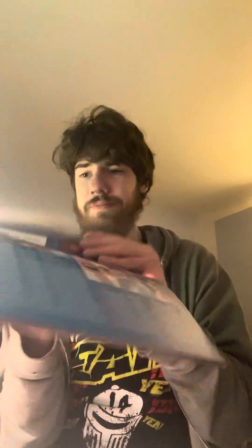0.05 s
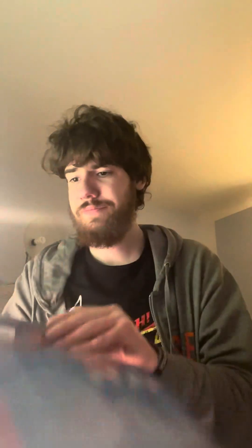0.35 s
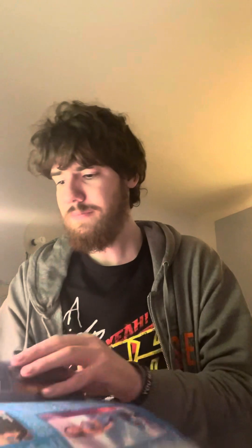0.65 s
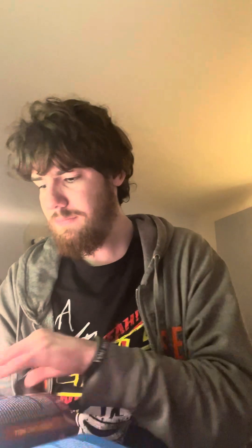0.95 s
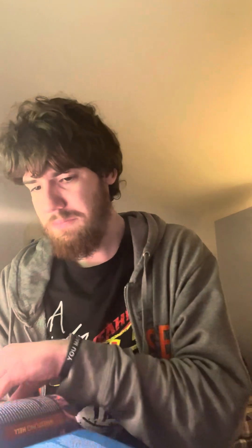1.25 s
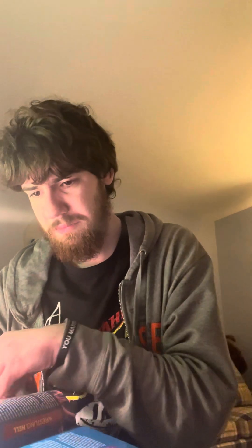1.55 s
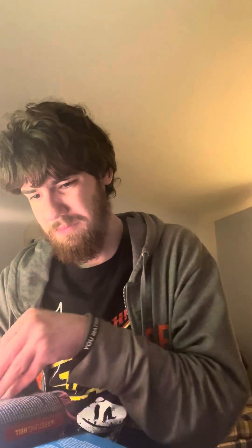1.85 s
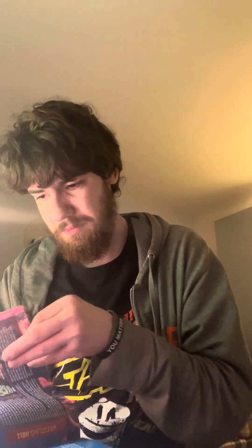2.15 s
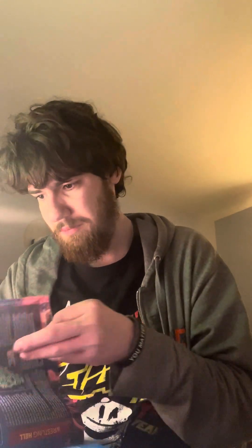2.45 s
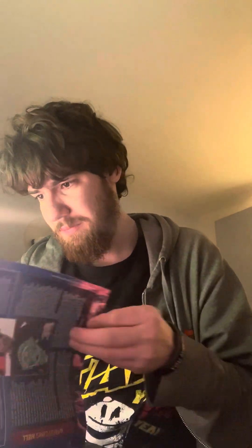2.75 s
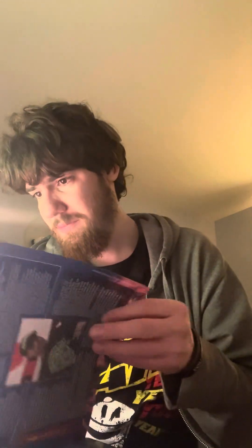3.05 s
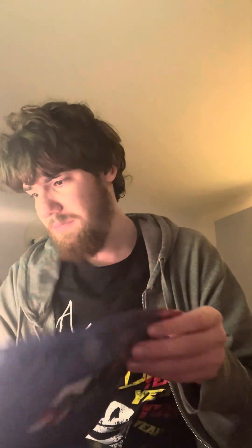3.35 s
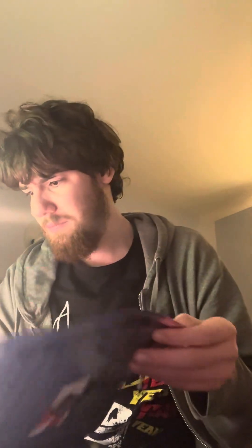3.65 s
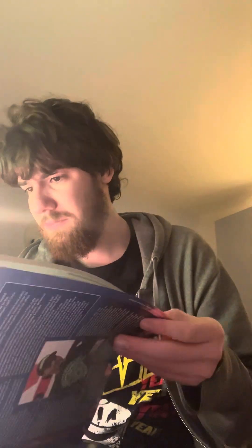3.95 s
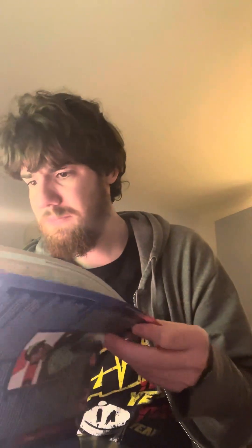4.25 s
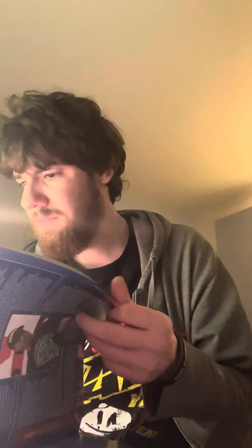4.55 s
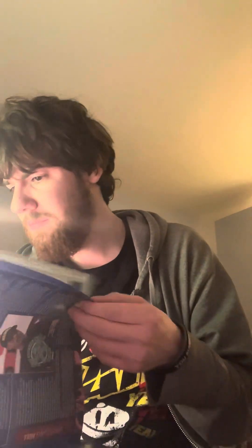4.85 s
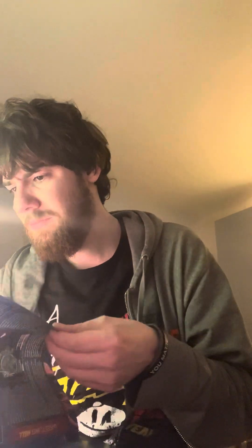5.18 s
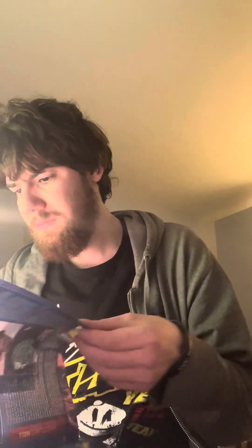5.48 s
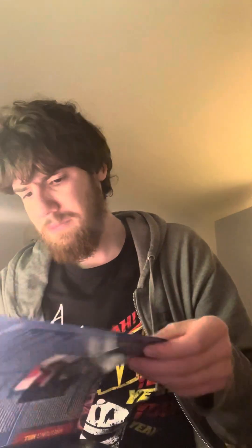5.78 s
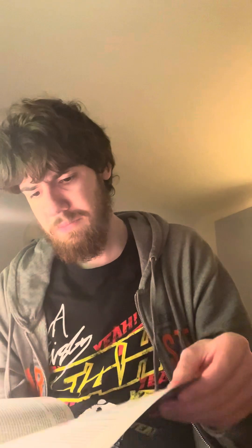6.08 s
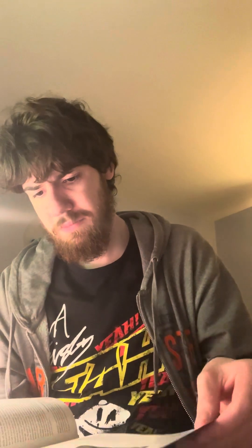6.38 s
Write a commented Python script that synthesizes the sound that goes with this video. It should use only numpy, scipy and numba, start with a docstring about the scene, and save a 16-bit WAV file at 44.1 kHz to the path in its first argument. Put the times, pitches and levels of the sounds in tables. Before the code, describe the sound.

A magazine cover slaps down, then someone leafs through the pages, making papery snaps, a grainy hiss and soft flaps.

```python
"""A glossy magazine is handled close to a phone in a small quiet room, over mains hum and low rumble.
First it slides off to one side and its cover slaps down. Then it is held in front and leafed through:
stick-slip friction makes a grainy hiss, buckling sheets send out snaps that dispersion draws into
falling chirps, and limp sheets flop over with dull flaps. Near 4 s one page is drawn slowly across the
stack; a flurry of snaps follows, and a faint drone joins near the end."""
import sys
import numpy as np
from scipy import signal
from scipy.fft import rfft, irfft, next_fast_len
from scipy.io import wavfile
from scipy.ndimage import uniform_filter1d
from numba import njit

SR = 44100
rng = np.random.default_rng(int(sys.argv[2]) if len(sys.argv) > 2 else 0)


def pcm_store(signal):
    """Save signal as 16-bit PCM."""
    levels = np.round(np.clip(np.atleast_2d(signal), -1, 1) * 32767)
    wavfile.write(sys.argv[1], SR, levels.astype(np.int16).T)


N = 283122
TIME = np.arange(N) / SR
SIZE = 8192  # samples in one short event
MS = (np.arange(SIZE) - SIZE // 2) * 1000 / SR  # time from the middle of that event [ms]


def undb(db):
    """Amplitude ratio of a level in decibels."""
    return 10 ** (np.asarray(db) / 20)


def unit(x):
    """Normalisation to unit rms."""
    return x / np.sqrt(np.mean(x ** 2))


def curve(rows):
    """Linear interpolation of a table's columns over time."""
    times, *columns = np.transpose(rows)
    return [np.interp(TIME, times, column) for column in columns]


def gains(points, hz):
    """Interpolation of a spectrum (frequency [Hz], level [dB]) on a logarithmic frequency axis."""
    corners, db = np.transpose(points)
    return undb(np.interp(np.log(hz + 1), np.log(corners), db))


def colour(x, points):
    """Linear filtering by a spectrum (frequency [Hz], level [dB])."""
    size = next_fast_len(len(x))
    return irfft(rfft(x, size) * gains(points, np.fft.rfftfreq(size, 1 / SR)), size)[:len(x)]


def add(track, s, x):
    """Superposition of a sound whose middle falls at time s."""
    start = int(s * SR) - len(x) // 2
    lo, hi = max(start, 0), min(start + len(x), N)
    track[lo:hi] += x[lo - start:hi - start]


def wander(rate):
    """Random modulation: straight lines between Gaussian values, rate of them a second."""
    steps = rng.standard_normal(4096)
    return 0.57 * np.interp(TIME * rate, np.arange(len(steps)), steps)


@njit
def resonate(x, hz, width):
    """Second-order resonance with a moving centre; width is bandwidth over centre frequency."""
    y, band, low = np.empty(len(x)), 0., 0.
    for i in range(len(x)):
        g = np.tan(np.pi * hz[i] / SR)
        v = (band + g * (x[i] - low)) / (1 + g * (g + width))
        band, low, y[i] = 2 * v - band, low + 2 * g * v, width * v
    return y


def mode(x, hz, width):
    """Resonance at a constant frequency."""
    return resonate(x, np.full(len(x), float(hz)), width)


def slips(size, spread_db):
    """Stick-slip noise: dense tiny slips of log-normal strength."""
    return unit(rng.standard_normal(size) * undb(spread_db * np.clip(rng.standard_normal(size), -3, 3)))


def disperse(x, travel_ms):
    """Dispersion of bending waves: travel time, given at 1 kHz, goes as 1 / sqrt(frequency)."""
    khz = np.fft.rfftfreq(len(x), 1 / SR) / 1000
    cycles = travel_ms * (2 * np.sqrt(khz) - khz / np.sqrt(2))  # 2 kHz stays in place
    return irfft(rfft(x) * np.exp(-2j * np.pi * cycles), len(x))


def impulse(scatter, rise_ms, decay_ms):
    """Impulsive excitation: slips build up to a sudden release and die away after it."""
    around = slips(SIZE, spread_db=3.5) * np.exp(-np.abs(MS / np.where(MS < 0, rise_ms, decay_ms)))
    return (MS == 0) + scatter * around / np.linalg.norm(around)


def radiate(x, points, db):
    """Radiation of a transient with a given spectrum and the energy of 10 ms at level db."""
    y = colour(x, points)
    return y * undb(db) * np.sqrt(SR / 100) / np.linalg.norm(y)


# harmonics of the mains: (frequency [Hz], level [dB])
MAINS_HUM = [(59.6, -60.5), (120, -65.5)]
# spectrum of the house's rumble: (frequency [Hz], level [dB])
HOUSE_RUMBLE = [(24, -25.5), (40, -14.5), (55, 4), (80, -3.5), (120, -6), (180, -16), (1000, -31),
                (3000, -40), (16000, -61.5)]
def background(rumble_db, apart_db):
    """Tones in noise: mains hum over a rumble that is partly coherent between the microphone ports."""
    hum = sum(np.sqrt(2) * undb(db) * np.sin(2 * np.pi * (hz * TIME + rng.random()))
              for hz, db in MAINS_HUM)
    shared, left, right = (unit(colour(rng.standard_normal(N), HOUSE_RUMBLE)) for _ in range(3))
    rumble = shared + undb(apart_db) * np.array([left, right])
    rumble *= undb(rumble_db + 0.38 * wander(rate=12))
    return (hum + rumble) * undb([[.9], [-.9]])


def drone(start_s, hz, db, width):
    """Narrow-band noise: a faint, wavering low note from elsewhere in the house."""
    note = unit(mode(mode(rng.standard_normal(N), hz, width), hz, width))
    return note * undb(db - ATTACK_DB_PER_S * np.maximum(start_s - TIME, 0))


def room(x, bass_t60_s, broad_t60_s):
    """Reverberation: exponentially decaying diffuse echoes, alike at both ports in the bass."""
    t = TIME[:SR // 2]
    bass_spectrum = [(110, 13.5), (180, 8), (380, 5), (550, -0.5), (1200, -30), (3000, -40)]
    broad_spectrum = [(100, 7.5), (600, 5.5), (5000, 2), (8000, -9.5), (15000, -28)]
    bass = colour(rng.standard_normal(len(t)), bass_spectrum)
    onset = np.clip((t - .003) / 0.0033, 0, 1)
    out = []
    for _ in range(2):
        broad = colour(rng.standard_normal(len(t)), broad_spectrum)
        tail = bass * undb(-60 * t / bass_t60_s) + broad * undb(-60 * t / broad_t60_s)
        out.append(signal.fftconvolve(x, tail * onset / np.sqrt(SR / 50))[:N])
    return np.array(out) * undb([[1.5], [-1.5]])


# reflection off the reader's chest: (left delay [ms], right delay [ms], gain [dB])
CHEST_ECHO = [(3.397, 3.695, -13)]
def chest_reflection(x):
    """Comb filtering: an early reflection interferes with the direct sound differently at each port."""
    reflected = colour(x, [(300, -44.5), (1500, 4), (5000, 7), (12000, -4.5)])
    return sum(undb(db) * np.array([np.interp(TIME - ms / 1000, TIME, reflected) for ms in delays])
               for *delays, db in CHEST_ECHO)


# excess of the left port over the right at full shade: (frequency [Hz], level [dB])
LEFT_EXCESS = [(200, 4.5), (700, 9), (1300, 5.5), (2100, 1.5), (2800, 13), (3600, 6.5), (4600, 2),
               (5800, 4.5), (8500, 0), (15000, 0)]
# lead of the left port for paper in front, to one side and below: (frequency [Hz], phase [rad])
LEAD_AHEAD = [(0, 0), (1500, 1.1), (2800, -.3), (4500, .1), (5500, .6), (8300, 3.1), (11000, 6.3),
              (16500, 12.6)]
LEAD_ASIDE = [(0, 0), (16500, 18.8)]
LEAD_BELOW = [(0, 0), (2500, 1.5), (7000, 2.5), (11000, 6.3), (16500, 12.6)]
def ports(x, lead, shade):
    """Path difference and shadowing: two ports differ in phase, and in level as scaled by shade."""
    size = next_fast_len(N + SIZE)
    hz = np.fft.rfftfreq(size, 1 / SR)
    left = gains(LEFT_EXCESS, hz) ** shade
    right = np.exp(-1j * np.interp(hz, *np.transpose(lead)))
    equal_power = np.sqrt(2 / (1 + left ** 2))
    return irfft(rfft(x, size) * np.array([left, right]) * equal_power, size)[:, :N]


# modes of the air under the arched pages: (frequency [Hz], bandwidth [Hz], gain [dB])
CAVITY_MODES = [(336, 40, -4.5), (1120, 290, -14)]
def cavity(x, coupling):
    """Cavity resonance: the air under the pages adds a hollow note to the sound that drives it."""
    return x + coupling * sum(undb(db) * mode(x, hz, width / hz) for hz, width, db in CAVITY_MODES)


# a page edge flicks past its neighbour: (time [s], level [dB], resonance [Hz])
EDGE_TICKS = [(.056, -58.5, 3700), (.183, -63, 4150), (.215, -62, 3300), (1.213, -57, 1770),
              (3.458, -62.5, 1020), (3.495, -58, 1020), (3.579, -56, 960), (4.216, -48, 3000),
              (5.18, -55, 4000), (5.269, -53, 3650), (5.348, -64, 5450), (6.083, -60.5, 4800)]
def ticks(width):
    """Impulse response of a heavily damped page edge: a dry click with a short ring."""
    out = np.zeros(N)
    for s, db, hz in EDGE_TICKS:
        click = impulse(scatter=1, rise_ms=0.5, decay_ms=2)
        add(out, s, radiate(mode(click, hz, width), [(300, -17), (700, -2)], db))
    return out


# brushes of a fingertip or page edge, and one very short bright burst that sharpens the crack of the loud snap
# at 5.43 s: (time [s], level [dB], half length [ms], resonance [Hz])
EDGE_SWISHES = [(.484, -46.5, 28, 4600), (.552, -47.5, 4.2, 4600), (0.802, -53, 7.8, 1920),
                (1.987, -38.5, 8.2, 2340), (2.037, -34.5, 5.3, 2320), (2.126, -42.5, 13, 1550),
                (2.314, -40.5, 3.3, 2220), (4.14, -40.5, 2.6, 3860), (4.199, -39.5, 3.7, 4250),
                (4.829, -30, 4.3, 2210), (5.006, -37.5, 5.5, 2230), (5.369, -46.5, 7.2, 3220),
                (5.403, -47.5, 8, 3230), (5.4293, -26, 0.49, 3270), (5.515, -38, 5, 3600)]
def swishes(width, gain_db):
    """Forced vibration: a burst of friction swells and dies in two resonances of the page edge."""
    out = np.zeros(N)
    for s, db, half_ms, hz in EDGE_SWISHES:
        rub = sum(mode(slips(SIZE, spread_db=1), hz * ratio, width) for ratio in (.9, 1.4))
        rub = unit(colour(rub, [(700, 9), (1900, 9), (6000, -1), (9000, 8.5), (16000, -10.5)]))
        add(out, s, rub * undb(db + gain_db) * np.exp(-.5 * (MS / half_ms) ** 2))
    return out


ATTACK_DB_PER_S, RELEASE_DB_PER_S = 752.5, 348
def gesture(start, length, arch_db):
    """Envelope of a stroke [dB]: it sets in, arches with the speed of the hand and dies away."""
    early, late = np.maximum(start - TIME, 0), np.maximum(TIME - start - length, 0)
    along = np.clip(2 * (TIME - start) / length - 1, -1, 1)
    return -ATTACK_DB_PER_S * early - arch_db * along ** 2 - RELEASE_DB_PER_S * late


# one page is drawn across the stack: (time [s], hiss [dB], drumming [dB], sheen [dB])
PAGE_PULL = [(3.74, -50.5, -64, -58.5), (3.84, -49, -52, -69.5), (3.94, -48.5, -51.5, -69.5),
             (3.99, -42, -42.5, -61), (4.05, -47, -49, -65), (4.25, -50, -52.5, -66.5),
             (4.32, -48.5, -64, -65), (4.41, -44, -51.5, -58), (4.55, -46, -56, -62.5),
             (4.635, -41.5, -56, -56.5), (4.70, -44.5, -54.5, -53.5), (4.76, -45.5, -49.5, -62.5),
             (4.83, -36, -54.5, -52), (4.89, -50.5, -48.5, -67)]
def page_pull():
    """Sustained friction: amplitude envelopes of hiss, drumming and sheen during the slow pull."""
    start, end = PAGE_PULL[0][0], PAGE_PULL[-1][0]
    return undb(np.array(curve(PAGE_PULL)) + gesture(start, end - start, arch_db=0))


# a hand or sheet slides over the paper:
# (start [s], length [s], hiss [dB], drumming [dB re hiss], sheen [dB re hiss])
HAND_STROKES = [(0.0, 0.2, -58.5, -3.5, -16), (0.277, 0.084, -60, -3.5, -11), (0.43, 0.054, -42, -4.5, -14),
                (0.469, 0.022, -37, -6, -8.5), (0.503, 0.15, -59.5, -6, -10.5),
                (0.704, 0.13, -58, -0.5, -11), (0.85, 0.16, -63, 1.5, -7), (1.142, 0.15, -66.5, 1.5, -5.5),
                (1.316, 0.084, -66, -1.5, -13), (1.436, 0.14, -69, -4, -14), (1.592, 0.25, -65, -4, -8.5),
                (1.89, 0.046, -60.5, 5, -9.5), (1.964, 0.18, -51, -4.5, -14), (2.237, 0.098, -51, 0, -21),
                (2.37, 0.037, -60.5, 3, -3.5), (2.452, 0.087, -70.5, 15, -8),
                (2.801, 0.023, -48.5, 2.5, -19), (2.883, 0.039, -49.5, -3.5, -22),
                (2.936, 0.18, -46, -4.5, -16.5), (3.118, 0.15, -62.5, -4, -8),
                (3.316, 0.049, -71, 2.5, -6.5), (3.499, 0.16, -68.5, 5, -9.5), (4.933, 0.03, -55, 9, -31),
                (4.98, 0.018, -44, 8, -16), (5.544, 0.27, -59.5, 2.5, -16.5),
                (5.858, 0.027, -56.5, 11, -15), (5.969, 0.16, -67.5, 2, -15), (6.185, 0.08, -65, -13, -9)]
def contact(rest_db):
    """Incoherent addition: the pull, the strokes and the faint rub of holding the pages sum in power."""
    power = page_pull() ** 2 + undb(rest_db) ** 2
    for s, length, db, drum, sheen in HAND_STROKES:
        envelope = undb(gesture(s, length, arch_db=3.5))
        power += np.outer(undb([db, db + drum, db + sheen]) ** 2, envelope ** 2)
    return np.sqrt(power)


def flare(x, depth_db):
    """Modal fluctuation: as the sheet bends its modes come and go, so narrow bands flare up briefly."""
    bands = signal.stft(x, nperseg=SIZE // 8)[2]
    swell = uniform_filter1d(rng.standard_normal(bands.shape), size=5, axis=0)  # across frequency
    swell = unit(uniform_filter1d(swell, size=2, axis=1))  # across time
    return unit(signal.istft(bands * undb(depth_db * swell))[1][:N])


# spectra of the friction's hiss, the sheet's drumming and the gloss's sheen: (frequency [Hz], level [dB])
HISS_SPECTRUM = [(700, -11), (1500, -2), (2200, 3.5), (3500, 4), (5500, 1), (7500, -6), (10000, -43.5),
                 (16000, -32)]
DRUM_SPECTRUM = [(120, -3), (600, 2.5), (850, -2.5), (1250, 1), (1700, -12), (2600, -26.5), (6000, -99.5)]
SHEEN_SPECTRUM = [(4000, -54), (7000, 1), (10500, 5.5), (12000, 0.5), (14000, -5)]
# the sheet's resonance climbs as it curls and sinks as it unrolls:
# (time [s], frequency [Hz], level [dB re hiss], overtone level [dB re hiss])
CURL_RESONANCE = [(.48, 2166, 1, -28), (1.4, 2136, 8, -22), (2.2, 1900, -0.5, -11), (2.9, 2240, 0.5, -8.5),
                  (3.02, 2010, -35, 4.5), (3.1, 1910, -6, -7), (3.75, 2210, -7, -0.5), (3.99, 1890, 6, 1),
                  (4.15, 1820, -4.5, -24), (4.3, 2650, -8.5, -5.5), (4.63, 2895, -2.5, -8.5),
                  (4.76, 3310, -5, -15), (5.3, 2360, -14, -44)]
def sliding(hiss_db, drum_db, sheen_db, curl_width, overtone_width, overtone_ratio, stutter_db, catch_db):
    """Stick-slip friction: uneven slips hiss, drum the paper and drive two resonances of its curl."""
    hiss, drum, sheen = contact(rest_db=-90)
    curl_hz, curl_db, overtone_db = curve(CURL_RESONANCE)
    grip = undb(wander(rate=17) + stutter_db * wander(rate=70) + wander(rate=1000))
    # about 80 times a second a fibre catches and lets go harder
    catches = (rng.random(N) < 80 / SR) * rng.uniform(-1.34, 1, N)
    grain = flare(slips(N, spread_db=2), depth_db=3.2) + undb(catch_db) * unit(catches)
    friction = disperse(grain, travel_ms=2.002) * grip
    out = unit(colour(friction, HISS_SPECTRUM)) * hiss * undb(hiss_db)
    out += unit(colour(friction, DRUM_SPECTRUM)) * drum * undb(drum_db)
    out += unit(colour(friction, SHEEN_SPECTRUM)) * sheen * undb(sheen_db)
    resonances = (curl_hz, curl_width, curl_db), (curl_hz * overtone_ratio, overtone_width, overtone_db)
    for centre, width, db in resonances:
        hz = centre * np.exp(.04 * wander(rate=30))
        drive = slips(N, spread_db=8.5) * grip
        curl = resonate(resonate(drive, hz, width), hz, width)
        out += unit(curl) * hiss * undb(hiss_db + db)
    return out


# a loose sheet or the spine flops: (time [s], level [dB], bass offset [dB], length [ms], boom [Hz])
SHEET_FLAPS = [(.058, -56, 21.5, 9.1, 216), (0.83, -58, 14.5, 1.15, 600), (0.957, -70, 31.5, 8.6, 111),
               (1.178, -50, 14, 9.4, 135), (2.352, -42, -6, 6, 445), (2.374, -53, 15, 10, 322),
               (3.186, -40, 8, 2.6, 392), (5.004, -34.5, -4, 7.6, 470), (5.666, -30.5, -1, 3.9, 574),
               (5.806, -42, 2, 2.8, 830), (6.028, -43, 1, 9.5, 720), (6.209, -41.5, -7, 11.7, 336),
               (6.258, -45.5, -6.5, 5.1, 378)]
def flaps(mid_db, bass_db, boom_width):
    """Damped plate modes: a limp sheet gives way in a run of soft folds and its whole face booms."""
    out = np.zeros(N)
    soft = np.array([(260, 1.5), (600, 3), (1150, -1.5), (1500, -13), (2300, -24), (3500, -65)])
    for s, db, bass, ms, hz in SHEET_FLAPS:
        wave = disperse(impulse(scatter=2.07, rise_ms=1, decay_ms=2.92 * ms), travel_ms=3.103)
        boom = sum(mode(wave, hz * k, boom_width / k) / k ** 2 for k in range(1, 4))
        face = soft * [2 ** ((db + 41.5) / 70), 1]  # a harder flop is brighter
        add(out, s, radiate(wave, face, db + mid_db))
        add(out, s, radiate(boom, [(900, -15), (2200, -20)], db + bass + bass_db))
    return out


# low thud of the paper in a slap or snap: (frequency [Hz], level [dB])
THUD_SPECTRUM = [(30, -21), (70, -0.5), (150, -5), (350, -1), (570, 2.5), (800, -3.5), (1400, -69)]
def cover_slap(s, db, bass_db, crack_db):
    """Air expulsion on impact: the cover lands flat and squeezes the air out with a sharp clap."""
    out = np.zeros(N)
    wave = disperse(impulse(scatter=0.42, rise_ms=0.17, decay_ms=2.8), travel_ms=0.86)
    clap = [(400, -40), (800, 3), (1300, 10.5), (1800, 2.5), (2300, 15.5), (3200, -39), (9000, -64)]
    edge = [(1500, -38.5), (2900, -0.5), (3800, -5.5), (4800, -15), (7000, -18), (12000, -55)]
    for spectrum, offset_db in (clap, 0), (THUD_SPECTRUM, bass_db), (edge, crack_db):
        add(out, s, radiate(wave, spectrum, db + offset_db))
    return out


# crack of a buckle: (frequency [Hz], level [dB])
CRACK_SPECTRUM = [(1300, 1.5), (2700, 5), (6300, -0.5), (10000, -8.5), (16000, -26.5)]
# ring of a buckle: (frequency [multiple of the ring frequency], level [dB])
RING_SPECTRUM = [(.29, -29.5), (.58, -2.5), (1, 16), (1.42, 0.5), (2, -4.5), (3, -67.5)]
# the paper buckles: (time [s], level [dB], bass offset [dB], crack offset [dB], ring frequency [Hz])
BUCKLES = [(0.1244, -48, -2, -2.5, 1220), (1.173, -50, 2, 1.5, 1930), (2.1434, -43, 2.5, -5, 1280),
           (2.18, -36, -11.5, -5, 1700), (2.1924, -41, 0, -0.5, 1340), (2.271, -40, 1.5, -0.5, 1280),
           (2.297, -36, -5.5, -3.5, 1400), (2.4561, -50, -3, -27, 1530), (2.5975, -31.5, -1.5, -8, 1240),
           (2.6624, -49, -2.5, -5.5, 1260), (2.6952, -51, -7, -10, 1500), (2.7725, -49, -6, -1, 1670),
           (2.7863, -42, -3.5, -9, 1130), (2.811, -38, 5, 2.5, 1160), (2.8797, -41, -7.5, 3.5, 1030),
           (2.9031, -44, -5.5, -6, 1940), (2.933, -45, -4.5, -10, 1240), (2.965, -48.5, -1.5, -8, 1090),
           (4.262, -41.5, -10, 6.5, 2310), (4.412, -40.5, -15, 6, 1050), (4.467, -40.5, -4.5, -16, 1070),
           (4.881, -48.5, 3.5, -8, 1090), (4.9912, -37, -2.5, 2.5, 1200), (5.0213, -40, 1, -1, 1180),
           (5.1226, -44.5, -2, -8.5, 1170), (5.138, -46, -1, -4.5, 1200), (5.1527, -39.5, -1.5, 1.5, 1260),
           (5.195, -34.5, -7, -4.5, 1190), (5.2186, -40, 1.5, 0, 1210), (5.2444, -40, 4, 3.5, 1360),
           (5.2956, -43, -11, -3, 1390), (5.373, -36, -1, -6.5, 1110), (5.4305, -20, -10, -2.5, 1270),
           (5.4432, -36.5, 1.5, -5, 1020), (5.516, -33.5, 3, -4.5, 1220), (5.538, -41, 2.5, -3.5, 1140),
           (5.564, -40, 2, 6.5, 1010), (5.588, -43.5, -3.5, -19, 1070), (5.621, -42, 1, 3.5, 1180),
           (5.6776, -33, -3, -35, 1200), (5.768, -56, 10, 6, 1100)]
def snaps(mid_db, bass_db, crack_db, travel_ms, skid_db, skid_hz, skid_ms):
    """Snap-through buckling: the sheet cracks, carries a falling chirp and skids on its neighbour."""
    out = np.zeros(N)
    for s, db, bass, crack, hz in BUCKLES:
        # thin snaps come from near the edge, so their waves travel less far
        travel = travel_ms * np.clip(1 + bass / 22, .25, 1.2) * rng.uniform(0.744, 1.168)
        wave = disperse(impulse(scatter=0.5, rise_ms=1.8, decay_ms=4.2), travel)
        crackle = disperse(impulse(scatter=1, rise_ms=1.6, decay_ms=3), travel)
        ring = np.array(RING_SPECTRUM) * [hz, 1]
        skid = slips(SIZE, spread_db=11) * (MS > 0) * np.exp(-(MS / skid_ms) ** 2)
        add(out, s, radiate(wave, ring, db + mid_db))
        add(out, s, radiate(wave, THUD_SPECTRUM, db + bass + bass_db))
        add(out, s, radiate(crackle, CRACK_SPECTRUM, db + crack + crack_db))
        add(out, s, radiate(mode(skid, skid_hz, width=0.62), HISS_SPECTRUM, db / 2 + skid_db))
    return out


def scene():
    """Superposition at two ports: direct paper sound, its reflections and the background."""
    # the magazine starts off to one side and is then held up in front, its pages arched
    ahead = np.interp(TIME, [1.6, 2.3], [0, 1])
    rub = sliding(hiss_db=-6, drum_db=-0.5, sheen_db=6, curl_width=.16, overtone_width=.22,
                  overtone_ratio=2.04, stutter_db=3, catch_db=-7.5)
    rub += swishes(width=0.25, gain_db=-1)
    folds = snaps(mid_db=-3.5, bass_db=0, crack_db=-8, travel_ms=2.557,
                  skid_db=-43.5, skid_hz=5200, skid_ms=24)
    folds += flaps(mid_db=4, bass_db=-6.5, boom_width=0.13) + ticks(width=.55)
    rub, folds = cavity(rub, coupling=0.4 * ahead), cavity(folds, coupling=0.3 * ahead)
    cover = cover_slap(s=.5738, db=-27, bass_db=-6.5, crack_db=-9.5)
    pages = rub + folds
    direct = ports(pages * ahead, LEAD_AHEAD, shade=0.98)
    direct += ports(pages * (1 - ahead), LEAD_ASIDE, shade=0.75)
    direct += ports(cover, LEAD_BELOW, shade=0.53)
    into_room = undb(-10.5) * rub + undb(-13) * folds
    into_room += colour(cover, [(450, -5.5), (800, -4), (2300, -14), (3200, -7.5)])
    echoes = chest_reflection(rub) + room(into_room, bass_t60_s=0.24, broad_t60_s=0.2)
    low_note = drone(start_s=5.95, hz=158, db=-61.5, width=0.23)
    return direct + echoes + low_note + background(rumble_db=-60, apart_db=-3.5)


def record(dry):
    """Band limiting: the phone drops the deepest bass and cuts the top."""
    lean = signal.sosfilt(signal.butter(4, 36, "highpass", fs=SR, output="sos"), dry)
    return signal.sosfilt(signal.ellip(10, .2, 70, 15900, fs=SR, output="sos"), lean)


dry = scene()
out = record(dry)
pcm_store(out)
```